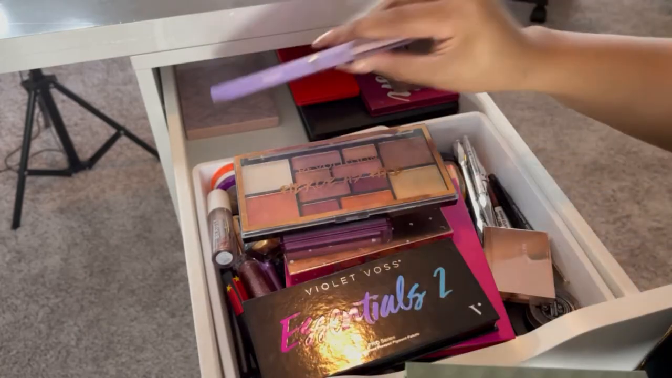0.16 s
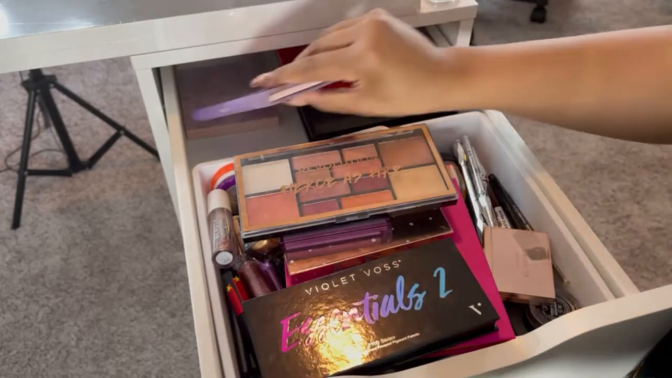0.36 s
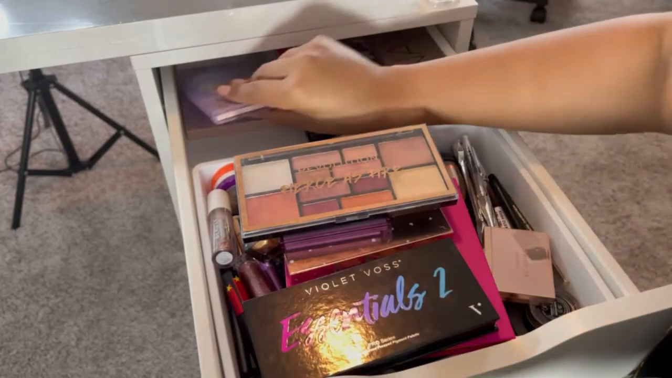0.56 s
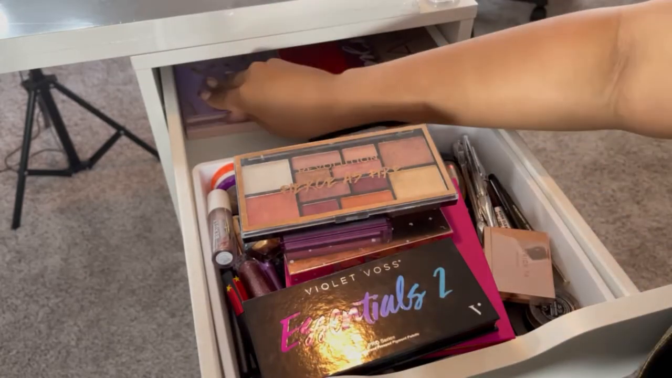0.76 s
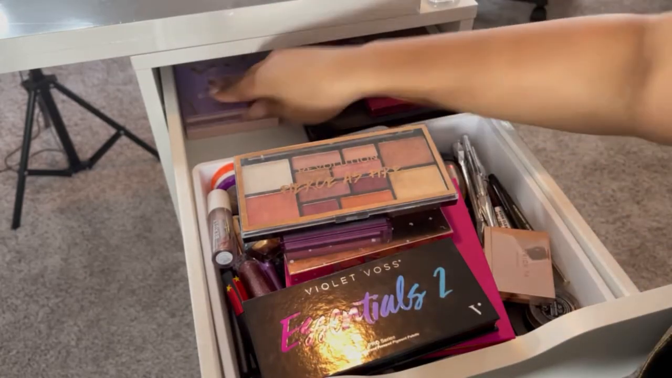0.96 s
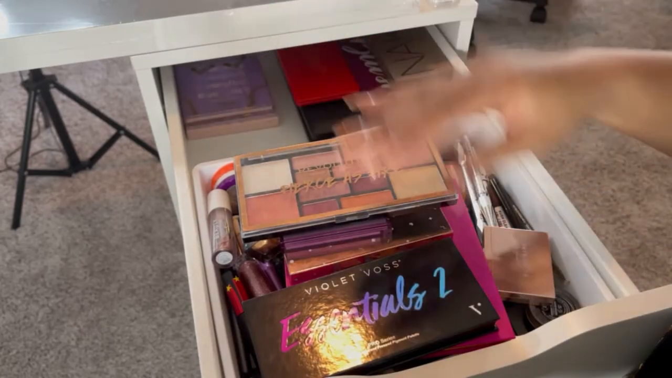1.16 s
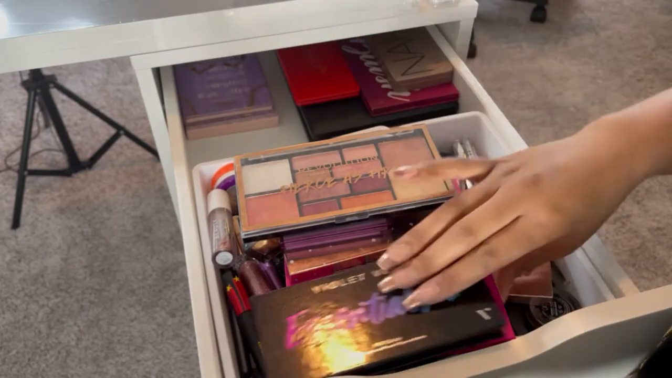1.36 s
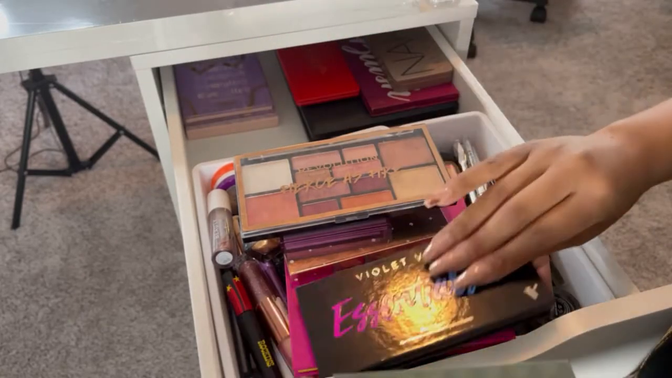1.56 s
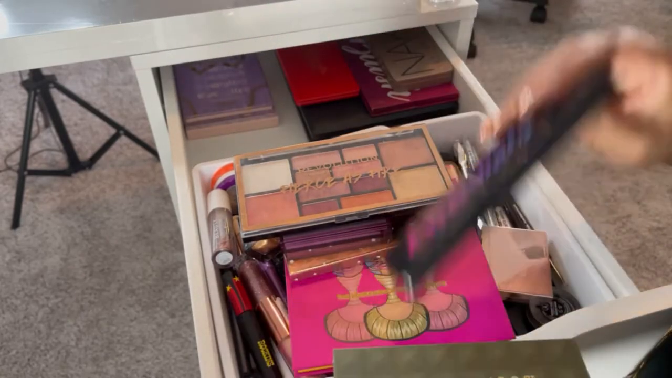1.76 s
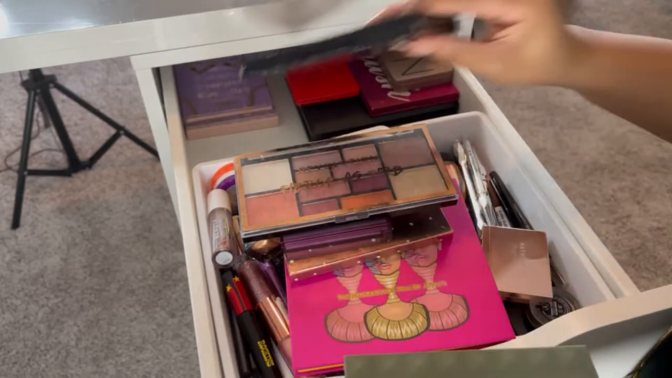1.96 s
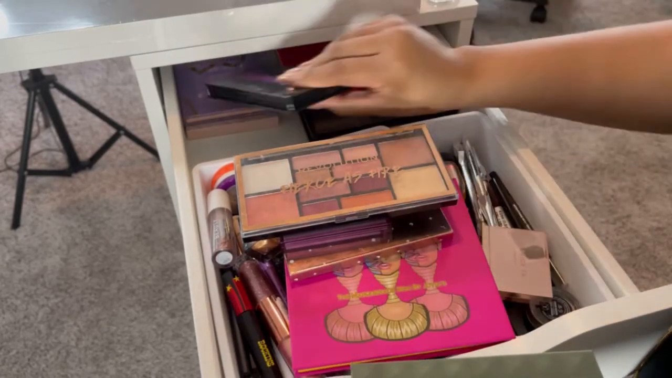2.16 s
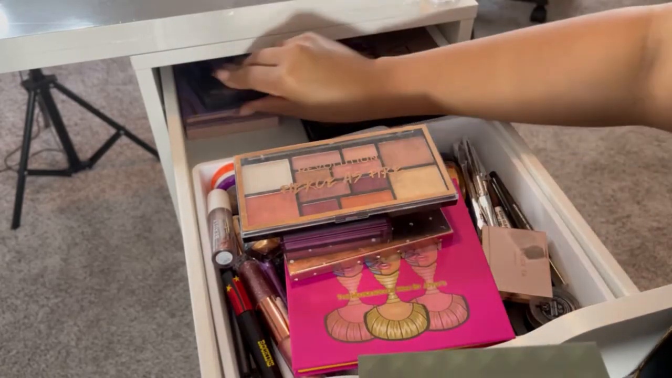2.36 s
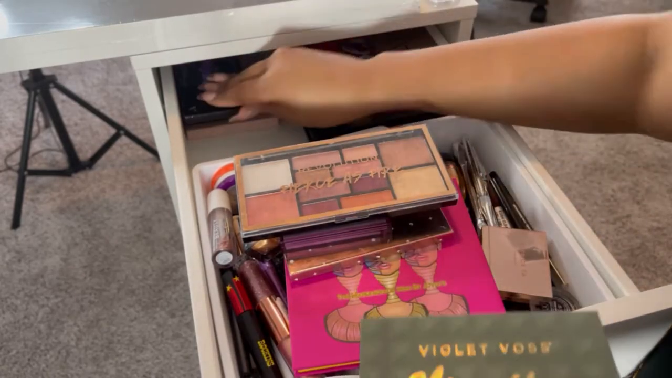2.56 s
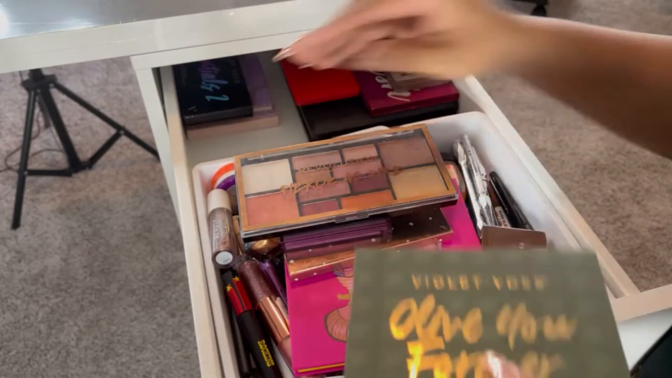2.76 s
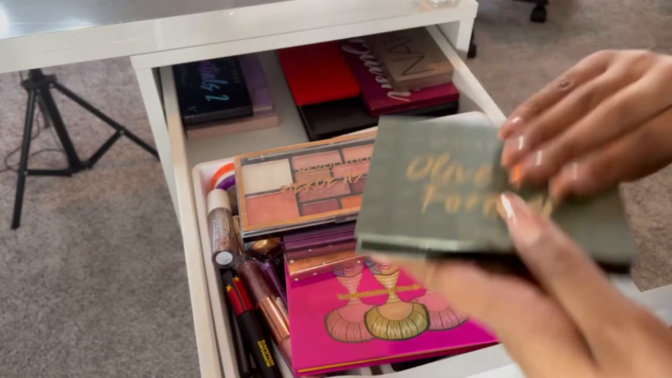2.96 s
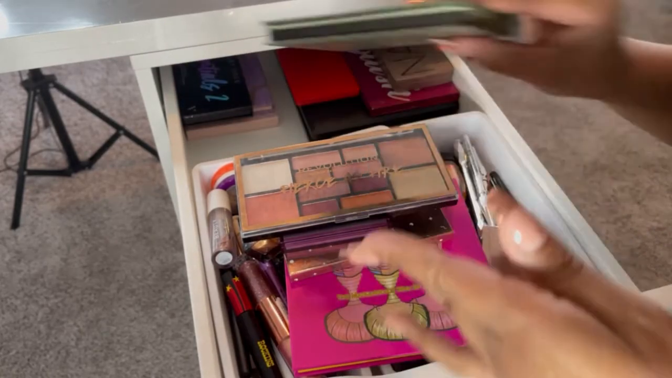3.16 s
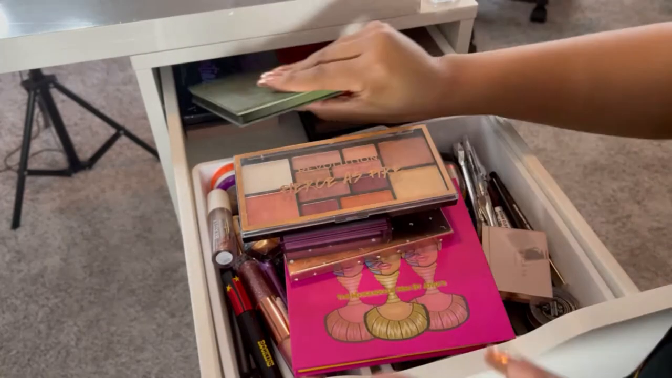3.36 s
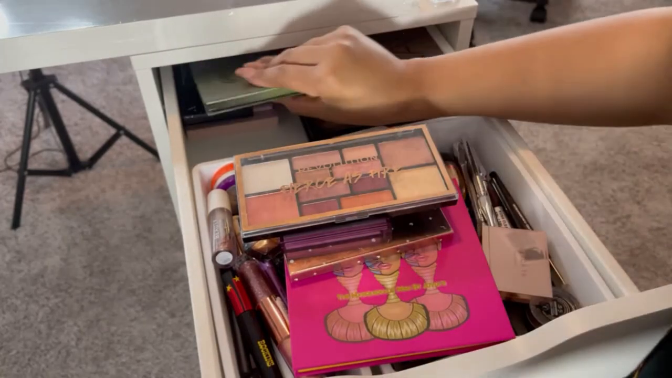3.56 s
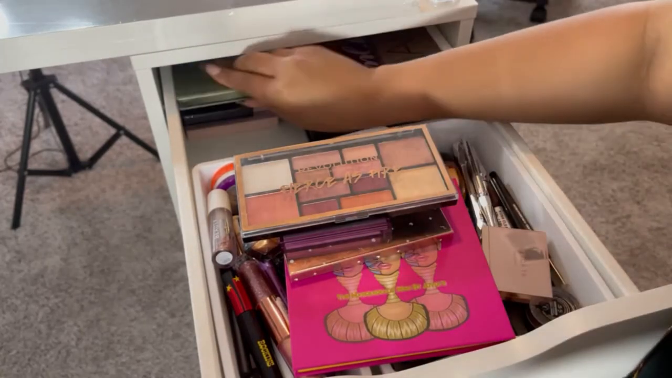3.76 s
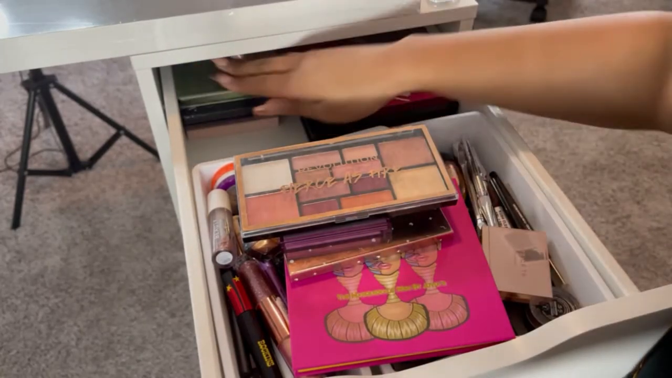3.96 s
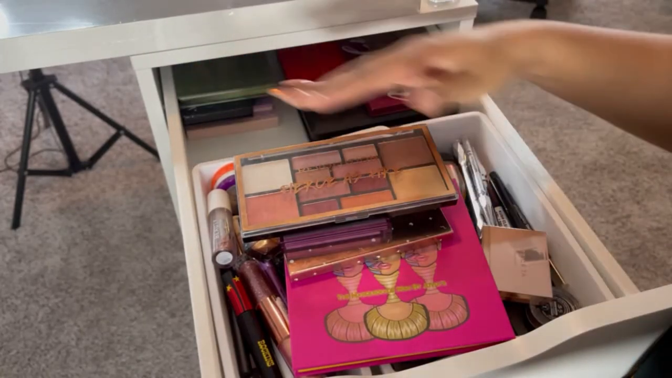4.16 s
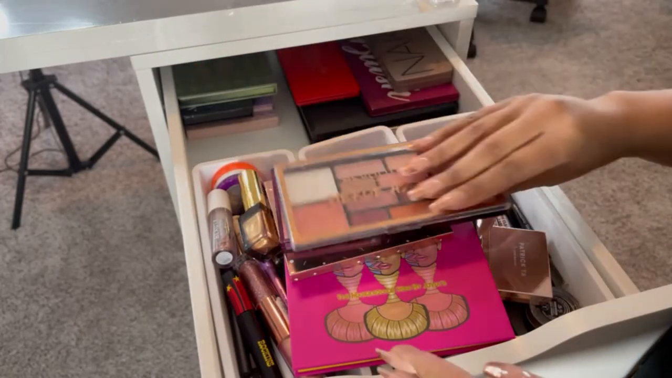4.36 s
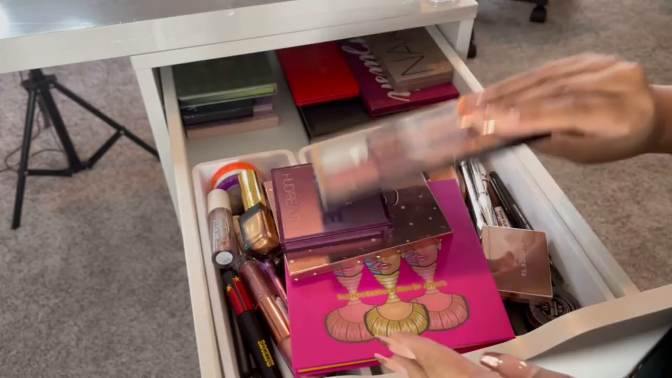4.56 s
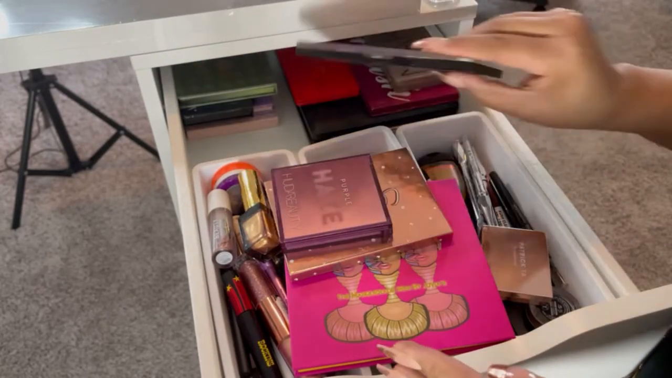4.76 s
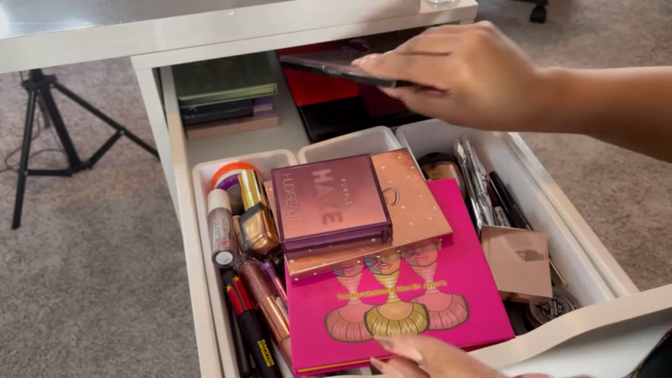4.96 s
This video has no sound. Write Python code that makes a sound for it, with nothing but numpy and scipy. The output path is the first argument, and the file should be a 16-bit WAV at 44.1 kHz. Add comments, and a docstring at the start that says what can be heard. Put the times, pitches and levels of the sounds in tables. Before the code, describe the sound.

Flat cardboard and plastic cases are picked up and stacked in a drawer, making clusters of knocks, low thuds and brief scrapes.

```python
"""Flat cardboard and plastic palettes, lifted from a tray and stacked at the back of an open wooden drawer.
Each contact is a crack and a short hollow ring; heavy landings set the drawer bottom booming, and faces
slide on each other with a hiss. The place is a small carpeted room that answers each knock, with a faint
rumble of room tone. A two-port microphone stands close by, the hollow of the drawer to its left."""
import sys
import numpy as np
from scipy import signal
from scipy.fft import rfft, irfft
from scipy.io import wavfile
from scipy.ndimage import uniform_filter1d

SR = 44100
rng = np.random.default_rng(int(sys.argv[2]) if len(sys.argv) > 2 else 0)


def unload_wav(signal):
    """Save mono or channel-first audio to the path in sys.argv[1] as 16-bit WAV at rate SR, clipped to [-1, 1]."""
    wavfile.write(
        sys.argv[1],
        SR,
        np.round(np.clip(np.atleast_2d(signal).T, -1, 1) * 32767).astype(np.int16),
    )


N = 224865

# still air in the room: (frequency [Hz], noise density [dB])
ROOM_TONE_SPECTRUM = [(24, -36.5), (40, 8), (121, -9.5), (233, -17.5), (943, -27.5), (1230, -26.5),
                      (10000, -38.5), (11900, -36), (12800, -45.5), (16600, -71.5), (22000, -120)]
# edges and faces meeting: (time [s], ring peak [dB], crack level [dB], ring centre [Hz], contact [s])
KNOCKS = [(0.179, -43, -43, 1090, 0.0032), (0.509, -27.5, -40, 510, 0.0059),
          (0.54, -17, -22.5, 250, 0.0068), (0.547, -2.5, -9.5, 447, 0.00066),
          (0.574, -19.5, -16.5, 264, 0.0067), (0.581, -6.5, -11.5, 494, 0.0016),
          (0.607, -13.5, -40, 516, 0.004), (0.743, -21, -23.5, 500, 0.0018),
          (0.837, -6.5, -20, 560, 0.0038), (0.844, -10.5, -16, 874, 0.0027),
          (0.855, -11, -13, 1255, 0.0065), (0.858, -1.5, -20.5, 471, 0.0045),
          (1.344, -17.5, -30.5, 630, 0.0083), (1.355, -32, -32.5, 560, 0.0017),
          (1.386, -12.5, -14, 1140, 0.0024), (1.4, -15, -35, 1300, 0.008), (1.417, -17, -35.5, 1300, 0.015),
          (1.454, -18, -22, 730, 0.00062), (1.463, -29, -30, 1400, 0.002), (1.486, -13, -33, 380, 0.0056),
          (1.508, -15, -20, 1760, 0.0053), (1.61, -17.5, -28, 1200, 0.017), (1.62, -14, -21.5, 407, 0.0019),
          (1.633, -34, -20, 1260, 0.0013), (1.638, -14.5, -16, 1240, 0.0018),
          (1.727, -31.5, -37, 870, 0.0072), (1.897, -37.5, -29, 1306, 0.0018),
          (2.318, -12, -25, 442, 0.0055), (2.329, -18, -24.5, 510, 0.003), (2.46, -8.5, -19.5, 600, 0.001),
          (2.476, -7.5, -33.5, 413, 0.0067), (2.559, -3, -10, 602, 0.00058),
          (2.563, -11.5, -12.5, 1930, 0.00081), (2.565, -5.5, -28, 523, 0.004),
          (2.574, -1, -13.5, 515, 0.0023), (2.578, -28, -21.5, 1630, 0.0035),
          (2.983, -45.5, -30, 518, 0.0019), (2.991, -33, -38, 282, 0.0012),
          (3.663, -21.5, -31, 473, 0.0032), (3.771, -21.5, -26, 400, 0.0045),
          (3.804, -9.5, -26, 420, 0.0015), (3.846, -7, -24, 453, 0.0063), (3.883, -12, -55, 480, 0.022),
          (3.915, -7, -27, 402, 0.025), (3.927, -1, -9.5, 424, 0.0037), (4.296, -23.5, -29.5, 1254, 0.0031),
          (4.301, -28, -59, 278, 0.0017), (4.383, -14.5, -25, 1440, 0.0042),
          (4.49, -10, -14.5, 1270, 0.0042), (4.49, -20, -55, 550, 0.00071), (4.61, -34, -23, 1450, 0.0027),
          (4.781, -53.5, -39, 1290, 0.0059), (4.955, -46.5, -53, 877, 0.011),
          (4.979, -29, -49.5, 373, 0.002), (5.049, -23.5, -33.5, 540, 0.002),
          (5.082, -36, -57.5, 404, 0.0032)]
# palette cases and drawer walls: (frequency [Hz], level [dB], t60 [s])
CASE_MODES = [(296, 0.5, 0.04), (351, 3, 0.013), (401.5, 0, 0.058), (510.5, 4, 0.065), (542.6, 4.5, 0.021),
              (628.8, 0.5, 0.028), (714.5, -0.5, 0.052), (785, 5, 0.011), (884, 2, 0.055), (1059, 3, 0.043),
              (1301, 4, 0.048), (1488, -0.5, 0.057), (1690, 2, 0.04), (2034, -1, 0.043), (2225, 5, 0.016)]
# the crack of a contact: (frequency [Hz], noise density [dB])
CRACK_SPECTRUM = [(500, -31), (1000, -1), (2500, -7), (7260, -14), (9000, -12), (11400, -10.5),
                  (16000, -19)]
# the carpeted room: (frequency [Hz], echo level [dB], t60 [s], left-right likeness [0-1])
ROOM_BANDS = [(80, -0.5, 0.13, 0.49), (240, -6, 0.58, 1), (395, -4.5, 0.45, 0.26), (997, -7.5, 0.47, 0.053),
              (2540, -6.5, 0.32, 0.014), (5034, -4.5, 0.34, 0.57), (7026, -8, 0.15, 0.31),
              (10880, -15, 0.2, 0.97)]
# weight landing on the drawer bottom: (time [s], peak [dB])
THUDS = [(0.526, -10.5), (0.565, -12.5), (0.611, -24), (0.658, -17.5), (0.847, -11.5), (1.35, -30.5),
         (1.488, -26), (1.626, -30), (2.325, -24.5), (2.47, -12), (2.578, -10), (3.675, -25.5),
         (3.776, -26), (3.815, -7), (3.866, -4.5), (3.927, -24), (3.949, -7.5), (4.303, -29.5),
         (4.382, -29.5), (4.494, -29.5), (4.981, -45), (5.057, -33.5)]
# the drawer's bottom panel: (frequency [Hz], level [dB], t60 [s])
DRAWER_MODES = [(73, -7.5, .38), (96.7, 4.5, 0.23), (109.1, 3.5, 0.28), (159.2, -7.5, .36),
                (210, -8.5, 0.36)]
# faces rubbing, one row a stroke: (start [s], length [s], fine hiss [dB], coarse hiss [dB], scrape [dB])
SLIDES = [(0.564, 0.14, -47, -46.5, -30.5), (0.734, 0.088, -52, -56.5, -40.5),
          (1.399, 0.12, -52, -43.5, -33), (1.495, 0.16, -85, -62.5, -37),
          (1.656, 0.086, -44.5, -50.5, -38.5), (2.34, 0.13, -44, -50, -43.5),
          (2.497, 0.097, -54.5, -55.5, -27), (3.003, 0.015, -47.5, -81, -56),
          (3.059, 0.02, -47.5, -74.5, -84), (3.454, 0.2, -96, -91, -67.5),
          (3.695, 0.063, -58.5, -67.5, -59.5), (3.835, 0.13, -46, -56.5, -26),
          (4.305, 0.075, -50, -54, -45.5), (4.407, 0.2, -48.5, -44.5, -45.5), (5.07, .06, -85, -49, -44)]
# bright hiss of rubbing: (frequency [Hz], noise density [dB])
HISS_SPECTRUM = [(900, -28.5), (1500, -12.5), (4000, -9.5), (7300, -1.5), (9000, 0), (11200, -3),
                 (12300, -15), (13000, -45)]
# dull scrape of rubbing: (frequency [Hz], noise density [dB])
SCRAPE_SPECTRUM = [(150, -18), (300, -8.5), (500, 3.5), (900, -4.5), (1400, -19.5), (2500, -36)]


def from_db(db):
    return 10 ** (np.asarray(db) / 20)


def rms_one(x):
    return x / np.sqrt(np.mean(x ** 2) + 1e-20)


def at_hz(table, hz, column=1):
    """One column of a table, read on a log-frequency axis."""
    table = np.array(table)
    return np.interp(np.log(np.maximum(hz, 1)), np.log(table[:, 0]), table[:, column])


def stereo_noise(spectrum, size):
    """Noise pair with the given spectrum, left and right as alike as the room makes them; rms 1."""
    hz = np.fft.rfftfreq(size, 1 / SR)
    mid, side = rfft(rng.standard_normal((2, size))) * from_db(at_hz(spectrum, hz))
    alike = np.clip(at_hz(ROOM_BANDS, hz, column=3), 0, 1)
    return rms_one(irfft(np.sqrt(1 + alike) * mid + np.sqrt(1 - alike) * side * [[1], [-1]], size))


def add(out, time_s, sound):
    """Mixes a short sound in at the given time."""
    start = round(time_s * SR)
    out[..., start:start + sound.shape[-1]] += sound[..., :N - start]


def room_tone(level_db=-55.5):
    """The air around the microphone: a steady low rumble with a trace of hiss."""
    return from_db(level_db) * stereo_noise(ROOM_TONE_SPECTRUM, N)


def palette_knocks(spread_octaves=0.83, lag_cycles=0.6, detune=0.019, hollow_db=5.0, lean_db=5.0):
    """Each blow cracks and rings the modes near one pitch. Returns direct sound and two room feeds."""
    direct, to_room = np.zeros((2, 2, N))
    t = np.arange(SR // 5) / SR
    hz, mode_db, t60 = np.transpose(CASE_MODES)
    mode_age = np.maximum(t - lag_cycles / hz[:, None], 0)   # bending waves: the lows arrive last
    decay = from_db(-60 * mode_age / t60[:, None])
    variations = rng.standard_normal((len(KNOCKS), 3, len(hz)))   # no two blows alike
    grit = stereo_noise(CRACK_SPECTRUM, N + len(t))
    octaves = np.log2(np.fft.rfftfreq(len(t), 1 / SR) / 1000 + 1e-3)   # above 1 kHz
    click_spectrum = from_db(at_hz(CRACK_SPECTRUM, 1000 * 2 ** octaves))
    for k, (time_s, ring_db, crack_db, centre_hz, contact_s) in enumerate(KNOCKS):
        force, tuning, colour = variations[k]
        contact_s = np.clip(contact_s, .0004, .02)
        softness_db = max(ring_db - crack_db, 0)

        away = np.log2(hz / centre_hz) / spread_octaves   # the place of the blow sets the centre
        away *= np.where(away > 0, 0.5 + 0.29 * softness_db, 1)   # soft blows miss the high modes
        strength = from_db(mode_db - 4.7 * np.abs(away) + 4.6 * force) * (-1) ** np.arange(len(hz))
        shifted_hz = hz * (1 + detune * tuning)   # the stack changes, its modes shift
        modes = decay * np.sin(2 * np.pi * shifted_hz[:, None] * mode_age)
        build_up = (1 - np.exp(-t / (0.18 * contact_s))) ** 2
        ring = (strength @ modes) * build_up
        ring = from_db(ring_db) * ring / np.abs(ring).max()

        # each edge has its own hollows, and soft blows are duller
        tint = from_db(hollow_db * np.interp(octaves, np.linspace(-1, 4, len(hz)), colour))
        dulling = from_db(-0.16 * softness_db * np.maximum(octaves, 0))
        start = round(time_s * SR)
        burst = irfft(rfft(grit[:, start:start + len(t)]) * dulling * tint, len(t))
        crack = from_db(crack_db) * rms_one(burst) * np.exp(-t / contact_s)
        add(direct, time_s, ring * from_db([[lean_db / 2], [-lean_db / 2]]) + crack)

        # over all directions the colour evens out: a blunter ring and a plain click of the same energy
        blunt = ring * np.exp(-t / (contact_s + 1 / centre_hz))
        click = np.roll(irfft(click_spectrum * dulling, len(t)), 128)[:512]
        spot = to_room[k % 2]   # two spots in the room take turns
        add(spot, time_s, blunt * np.sqrt(np.sum(ring ** 2) / np.sum(blunt ** 2)))
        add(spot, time_s, click * np.sqrt(np.sum(crack ** 2) / 2 / np.sum(click ** 2)))
    bass_cut = signal.butter(2, 290., "high", fs=SR, output="sos")   # small cases send out no bass
    return direct, signal.sosfilt(bass_cut, to_room)


def room_echoes(spot, rise_s=0.0002):
    """The room's answer to one spot: half-octave bands of dense echoes, each dying at its own rate."""
    t = np.arange(SR // 2) / SR
    edges_hz = 60 * 2 ** np.arange(0, 8.5, .5)
    noises = [stereo_noise([(20, 0), (20000, 0)], len(t)) for _ in range(2)]
    echoes = 0
    for k, (low, high) in enumerate(zip(edges_hz, edges_hz[1:])):
        hz = np.sqrt(low * high)
        t60 = at_hz(ROOM_BANDS, hz, column=2)
        bandpass = signal.butter(2, [low, high], "band", fs=SR, output="sos")
        band = signal.sosfilt(bandpass, noises[k % 2])   # neighbouring bands unrelated
        decay_energy = SR * t60 / (6 * np.log(10))
        echoes += from_db(at_hz(ROOM_BANDS, hz) - 60 * t / t60) / np.sqrt(decay_energy) * band
    echoes *= 1 - np.exp(-t / rise_s)
    return signal.fftconvolve(spot[None], echoes, axes=1)[:, :N]


def drawer_thuds(push_s=0.0077):
    """A landing is a soft push, so the bottom panel takes about a cycle to swing up and boom."""
    out, t = np.zeros(N), np.arange(SR // 2) / SR
    boom = sum(from_db(db - 60 * t / t60) * np.sin(2 * np.pi * hz * t) for hz, db, t60 in DRAWER_MODES)
    boom *= 1 - np.exp(-t / push_s)
    for time_s, peak_db in THUDS:
        add(out, time_s, from_db(peak_db) * boom / np.abs(boom).max())
    return out


def sliding_faces(rise_db_per_s=402, fall_db_per_s=303, split_hz=3000, catches_per_s=250, uneven_db=2.0):
    """Friction noise swells, holds and fades with each stroke; small catches make it grainy."""
    t, envelopes = np.arange(N) / SR, 0
    for start_s, length_s, *levels_db in SLIDES:
        before_s, after_s = np.maximum(start_s - t, 0), np.maximum(t - start_s - length_s, 0)
        stroke = from_db(-rise_db_per_s * before_s - fall_db_per_s * after_s)
        envelopes += np.outer(from_db(levels_db), stroke)
    edges_hz = split_hz * 2 ** np.arange(-2, 2.5, .5)
    pressure = rng.standard_normal((len(edges_hz), N))   # one row for the scrape, one per hiss band
    pressure = uniform_filter1d(uniform_filter1d(pressure, size=600), size=600)   # lumps of about 15 ms
    catches = (rng.random(pressure.shape) < catches_per_s / SR) * rng.exponential(1, pressure.shape)
    catches = signal.lfilter([1], [1, -.98], catches + catches[0] / 2)   # each dies in about 1 ms
    grain = from_db(uneven_db * rms_one(pressure)) * (1 + from_db(-7) * catches)
    hiss = stereo_noise(HISS_SPECTRUM, N)
    bands = [gain * signal.sosfilt(signal.butter(2, [low, high], "band", fs=SR, output="sos"), hiss)
             for gain, low, high in zip(grain[1:], edges_hz, edges_hz[1:])]
    fine, coarse = sum(bands[4:]), sum(bands[:4])   # above and below split_hz
    scrape = grain[0] * stereo_noise(SCRAPE_SPECTRUM, N)
    return sum(envelope * rms_one(layer) for envelope, layer in zip(envelopes, (fine, coarse, scrape)))


def scene():
    """At the microphone: knocks, booms and rubbing close up, the room behind them."""
    knocks, to_room = palette_knocks()
    booms = drawer_thuds() * from_db([[-0.3], [0.3]])   # a hair right of centre
    rubbing = sliding_faces()
    echoes = sum(room_echoes(spot) for spot in to_room)
    return knocks + booms + echoes + rubbing + room_tone()


def record(dry):
    """The left port's cavity turns the phase once round in the treble; then rumble and top are cut."""
    port_hz, port_width_hz, cutoff_hz = 10200, 1500, 16500
    radius, angle = np.exp(-np.pi * port_width_hz / SR), 2 * np.pi * port_hz / SR
    cavity = [1, -2 * radius * np.cos(angle), radius ** 2]
    sound = np.array([signal.lfilter(cavity[::-1], cavity, dry[0]), dry[1]])
    sound = signal.sosfilt(signal.butter(4, 58., "high", fs=SR, output="sos"), sound)
    sound = np.tanh(sound / 1.5) * 1.5   # peaks flatten
    treble_cut = signal.cheby1(10, 1, 12200, fs=SR, output="sos")
    sound = signal.sosfilt(treble_cut, sound) + from_db(-32) * sound   # much fainter above about 12 kHz
    top_cut = signal.cheby2(12, 70, cutoff_hz, fs=SR, output="sos")
    return signal.sosfilt(top_cut, np.clip(sound, -.98, .98))


dry = scene()
out = record(dry)
unload_wav(out)
```